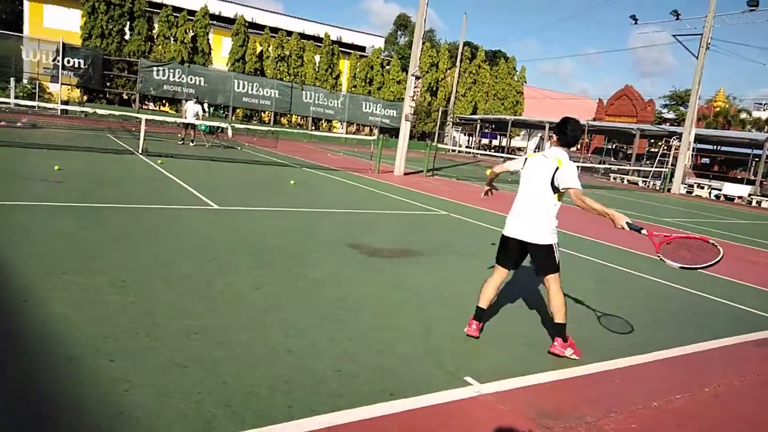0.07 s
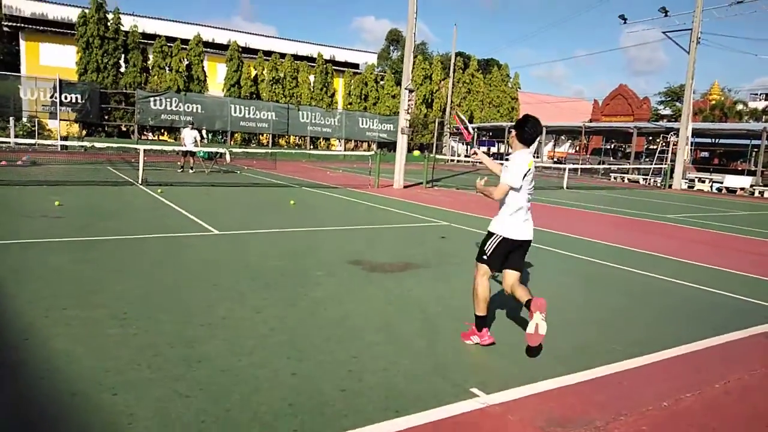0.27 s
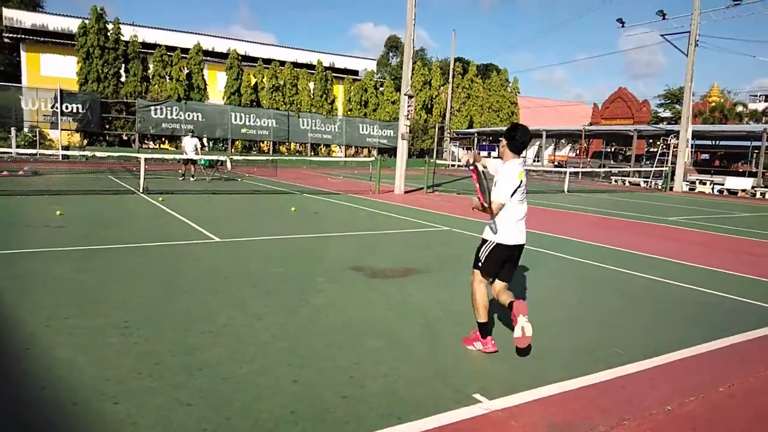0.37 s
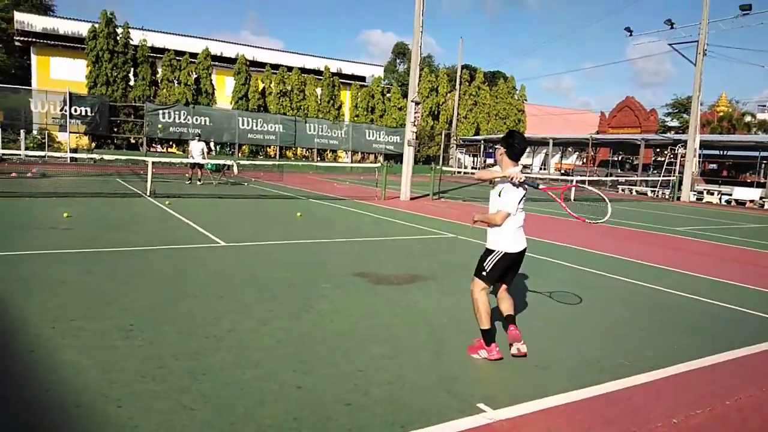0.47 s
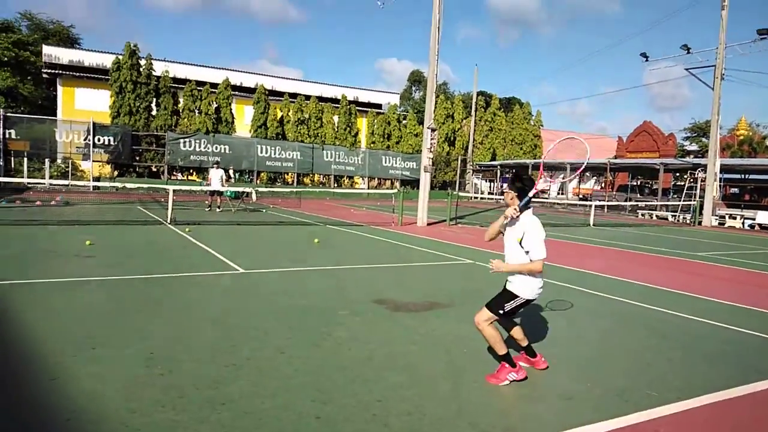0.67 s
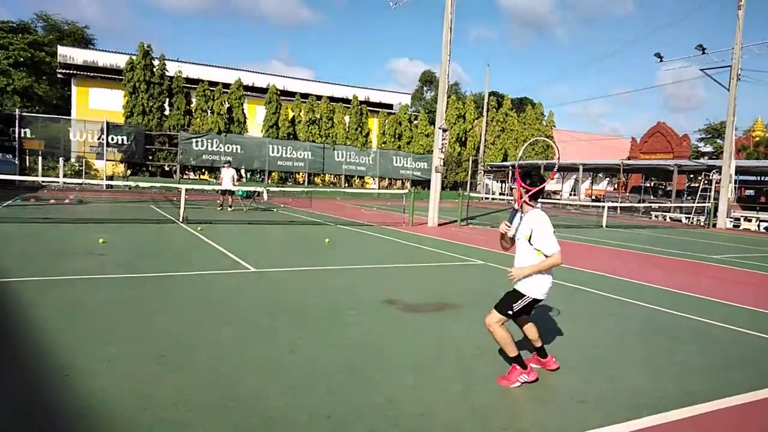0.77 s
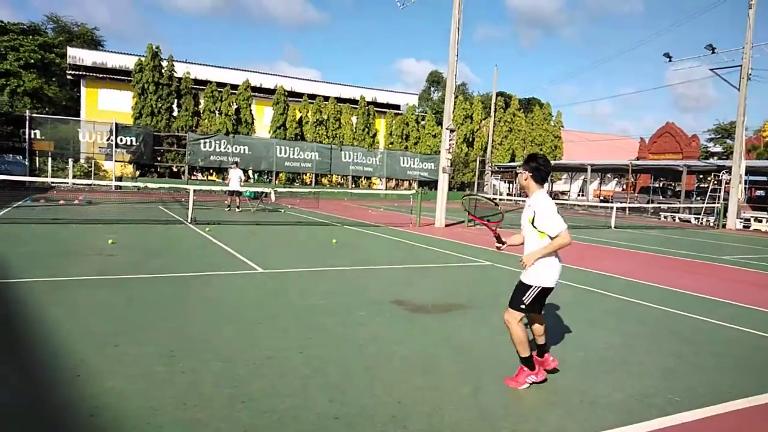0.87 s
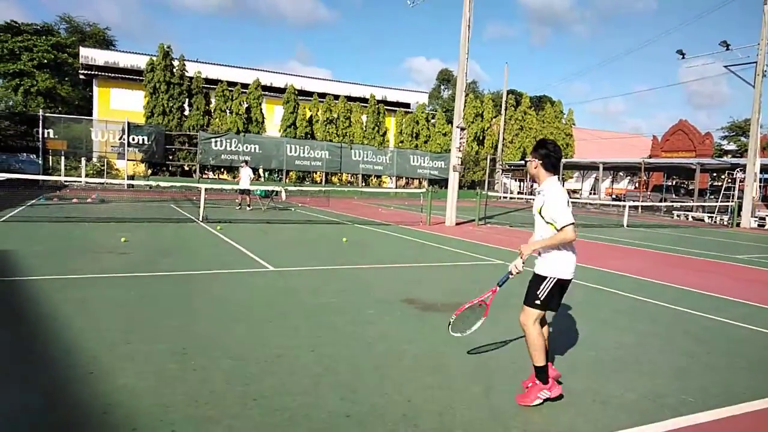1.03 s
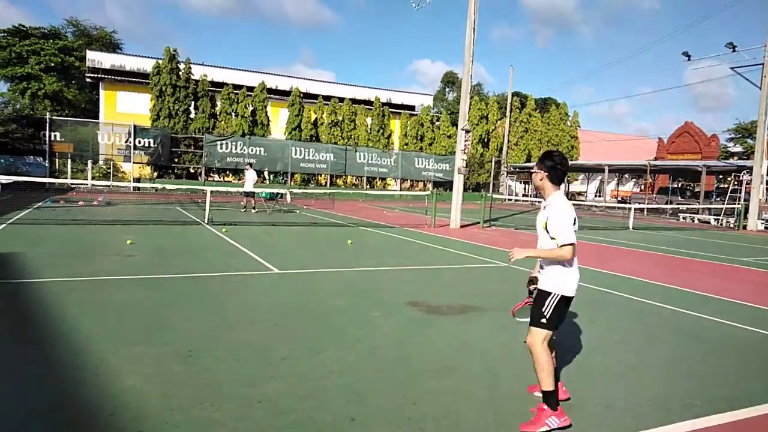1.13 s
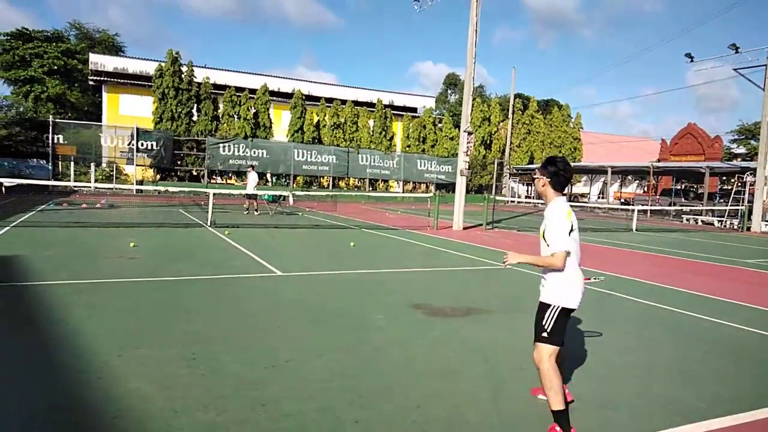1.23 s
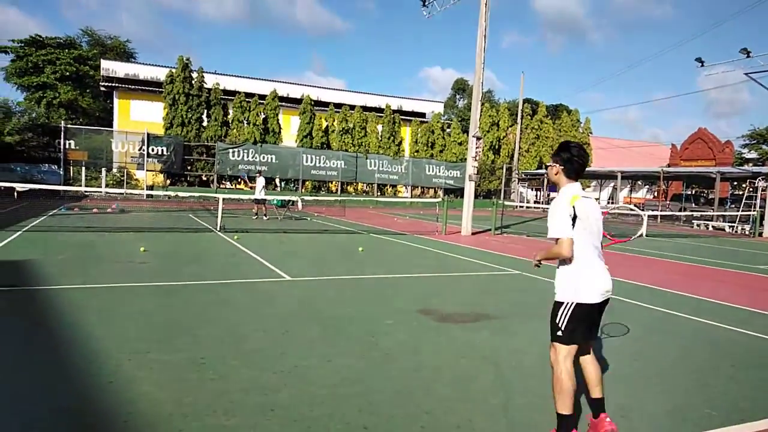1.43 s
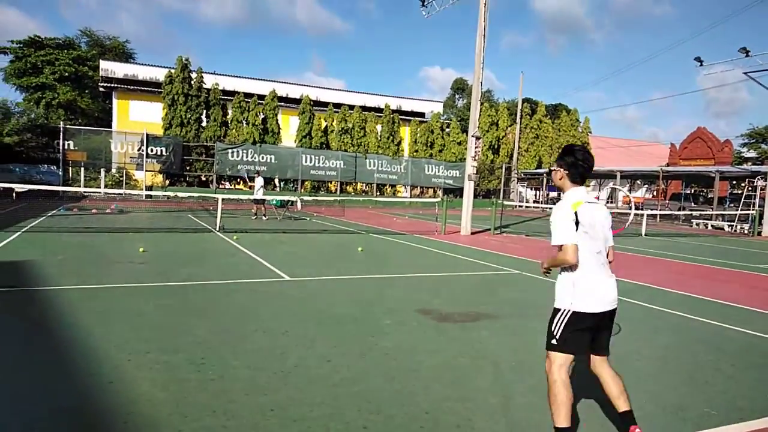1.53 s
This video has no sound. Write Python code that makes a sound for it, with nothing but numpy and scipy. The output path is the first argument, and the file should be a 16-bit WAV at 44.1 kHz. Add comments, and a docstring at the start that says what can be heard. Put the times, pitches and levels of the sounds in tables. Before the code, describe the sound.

One tennis ball hit echoes over an outdoor court, between brief squeaks of rubber soles.

```python
"""A tennis forehand on an outdoor hard court, over faint air and light wind.
A rubber sole scuffs and squeaks at the push-off, the racket swishes in, and the ball pops off the strings.
Fences and buildings send back separate echoes and a thin tail. The other shoe lands with a squeak
and a short slide, a puff of wind passes, and small taps, soft steps and gritty scuffs follow."""
import sys
import numpy as np
from scipy import signal
from scipy.fft import rfft, irfft, next_fast_len
from scipy.io import wavfile
from scipy.ndimage import map_coordinates

SR = 44100
rng = np.random.default_rng(int(sys.argv[2]) if len(sys.argv) > 2 else 0)


def master_out(mix):
    """Clip the mix to full scale and print it as 16-bit PCM to the path in sys.argv[1]."""
    frames = np.transpose(np.atleast_2d(mix))
    ceiling = np.clip(frames, -1, 1)
    pcm = np.round(ceiling * 32767).astype(np.int16)
    wavfile.write(sys.argv[1], SR, pcm)


N = 70560


def amp(db):
    """Decibels to gain."""
    return 10 ** (np.asarray(db) / 20)


def unit(x):
    """x at rms 1."""
    return x / np.sqrt(np.mean(x ** 2) + 1e-20)


def along(points, hz):
    """Read a curve of (Hz, value) points on a log frequency axis."""
    f, v = np.transpose(points)
    return np.interp(np.log(hz + 1), np.log(f + 1), v)


def since(s):
    """Seconds since s, zero before."""
    return np.maximum(np.arange(N) / SR - s, 0)


def envelope(start, attack, t60, hold=0):
    """Rise, hold and exponential release, all in seconds; t60 is the time to fall 60 dB."""
    t = since(start)
    return (1 - np.exp(-t / attack)) * 10 ** (-3 * np.maximum(t - hold, 0) / t60)


def wobble(rate):
    """A smooth random curve, rate knots a second."""
    return map_coordinates(rng.standard_normal(4096), [np.arange(N) * rate / SR], mode="wrap")


def filtered(x, response):
    """x through a filter given as gain against frequency."""
    size = next_fast_len(2 * N)
    return irfft(rfft(x, size) * response(np.fft.rfftfreq(size, 1 / SR)), size)[:N]


def eq(x, curve):
    """x through an EQ curve of (Hz, dB) points."""
    return filtered(x, lambda hz: amp(along(curve, hz)))


def low_cut(x, corner_hz):
    """Roll off the bass at 6 dB an octave."""
    return filtered(x, lambda hz: 1j * hz / (corner_hz + 1j * hz))


def noise(colour):
    """Noise of rms 1, coloured by (Hz, dB) points."""
    return unit(eq(rng.standard_normal(N), colour))


def air():
    """A steady outdoor bed, and light wind rumbling on the microphone with one stronger puff."""
    # Colours of the bed and the wind. Each row: frequency in Hz, relative level in dB.
    bed_colour = [(20, -3), (100, -9.5), (200, -12.5), (400, -22), (700, -19.5), (1100, -20.5), (1700, -28),
                  (2500, -31), (5200, -37), (6800, -32), (9000, -39.5), (13000, -37), (16000, -32.5)]
    wind_colour = [(20, -3), (40, 0), (75, -4.5), (130, -12), (300, -47), (1000, -86.5)]
    puff_s, puff_width_s, puff_db, sway_db = 0.789, 0.041, 8, 3.2
    puff = np.exp(-((since(0) - puff_s) / puff_width_s) ** 2)
    gusts = amp(sway_db * wobble(22) + puff_db * puff)
    return amp(-61.5) * noise(bed_colour) + amp(-62.5) * gusts * noise(wind_colour)


def tail(x):
    """Diffuse reverb from the trees and buildings around the court."""
    # Tone of the reverb. Each row: frequency in Hz, gain in dB.
    colour = [(100, -15), (200, 5.5), (300, 3.5), (500, -0.5), (1100, 0), (2200, 6), (4000, -6),
              (7000, 1.5), (14000, -7)]
    # Decay across the spectrum. Each row: frequency in Hz, t60 in seconds.
    decay_times = [(150, 1.1), (600, 1.36), (1100, 1.345), (2200, 0.97), (3500, 1), (7000, 0.91),
                   (14000, 0.81)]
    hz, t, bands = signal.stft(rng.standard_normal(N), SR, nperseg=256)
    fade = amp(-60 * t / along(decay_times, hz)[:, None])
    wash = signal.istft(bands * fade, SR, nperseg=256)[1][:N]
    wash *= 1 - np.exp(-since(0) / .028)  # builds up after the first echoes
    response = eq(wash / np.linalg.norm(wash), colour)
    return amp(-15.5) * signal.fftconvolve(x, response)[:N]


def wall_echoes(racket, push, landing):
    """Fences and rough walls return separate, smeared echoes with little bass."""
    # The reflections. Each row: delay in seconds, treble edge in Hz,
    # then sends in dB for the racket, the push-off and the landing.
    reflections = [(0.0259, 9000, -19.5, -34, -14.5), (.0415, 3000, -19, -29, -34),
                   (0.07, 1500, -31, -40, -40), (.0915, 9000, -24, -36, -18.5),
                   (0.1349, 4000, -20, -33, -20.5), (.1405, 1300, -29, -23, -30),
                   (.168, 1800, -25, -34, -26), (.2, 1300, -34, -42, -38), (.238, 1800, -26, -33, -41),
                   (.41, 2000, -35.5, -44, -30.5)]
    out = np.zeros(N)
    for column, source in enumerate((racket, push, landing)):
        response = np.zeros(N)
        for delay, edge_hz, *sends_db in reflections:
            wall = rng.standard_normal(N) * envelope(delay, 0.00059, t60=.03)
            wall *= amp(-1.5) / np.linalg.norm(wall)  # scatter sits just under the clean bounce
            wall[round(delay * SR)] += 1
            treble_cut = signal.butter(1, min(edge_hz, SR / 3), fs=SR)
            response += amp(sends_db[column]) * signal.lfilter(*treble_cut, wall)
        out += signal.fftconvolve(source, low_cut(response, 250))[:N]
    return out


def taps():
    """Light knocks: a click and one damped resonance."""
    # Each row: start in seconds, level in dB, resonance in Hz, t60 in seconds, treble edge in Hz.
    knocks = [(1.2169, -47.5, 921, 0.023, 2170), (1.505, -46, 1820, 0.009, 9100)]
    out = np.zeros(N)
    for start, db, hz, t60, edge_hz in knocks:
        colour = [(hz / 2, -10), (hz, 0), (edge_hz, -10), (edge_hz * 2, -32)]
        click = noise(colour) * envelope(start, 0.00024, t60)
        ring = np.sin(2 * np.pi * hz * since(start)) * envelope(start, 0.00069, t60)
        out += amp(db) * (amp(-2.5) * click + amp(1.5) * ring)
    return out


def scuffs():
    """Soles drag over grit: a hiss with separate grains cracking in it."""
    # The drags. Each row: start in seconds, level in dB, attack and t60 in seconds.
    drags = [(0.19, -48, 0.012, 0.42), (0.232, -45, 0.0019, 0.087), (.32, -48.5, 0.024, 0.22),
             (.386, -58, 0.0022, 0.029), (0.45, -52.5, 0.0018, 0.0526), (0.702, -49.5, .01, 0.14),
             (1.312, -51, 0.0041, 0.08), (1.53, -49.5, 0.00039, 0.027), (1.538, -52, .001, 0.055),
             (1.557, -60.5, .0005, 0.04)]
    # Colour of the grit. Each row: frequency in Hz, relative level in dB.
    colour = [(300, -12.5), (1500, -5), (2500, -3.5), (4000, -5), (6500, 4), (9000, -5.5), (12500, -12),
              (15500, -1.5)]
    grains_per_s, grain_energy_share = 800, .35
    out = np.zeros(N)
    for start, db, attack, t60 in drags:
        grains = unit((rng.random(N) < grains_per_s / SR) * rng.standard_normal(N))
        hiss = rng.standard_normal(N)
        grit = np.sqrt(grain_energy_share) * grains + np.sqrt(1 - grain_energy_share) * hiss
        out += amp(db) * unit(eq(grit, colour)) * envelope(start, attack, t60)
    return out


def footsteps():
    """Each soft footfall is a slap and a low heel thud."""
    # Each row: start in seconds, slap and thud levels in dB, attack and t60 in seconds.
    footfalls = [(0.244, -51, -52, 0.006, 0.11), (0.688, -48.5, -67, 0.0063, 0.18),
                 (1.281, -50.5, -61, 0.00045, 0.19), (1.531, -53.5, -59, 0.007, 0.21),
                 (1.579, -56.5, -60.5, 0.0024, 0.18)]
    # Colours of the slap and the thud. Each row: frequency in Hz, relative level in dB.
    slap_colour = [(100, -43), (450, -10), (850, 2), (1200, -6.5), (1550, -5), (2000, -27), (5000, -33),
                   (11000, -31.5), (15500, -19.5)]
    thud_colour = [(40, -12), (160, -5), (400, 0.5), (900, -31.5), (3000, -46.5)]
    out = np.zeros(N)
    for start, slap_db, thud_db, attack, t60 in footfalls:
        impact = amp(slap_db) * noise(slap_colour) + amp(thud_db) * noise(thud_colour)
        out += impact * envelope(start, attack, t60)
    return out


def swish():
    """The strings sweep through the air, swelling and fading into the stroke."""
    # Colour of the rush. Each row: frequency in Hz, relative level in dB.
    colour = [(150, -11), (400, -3.5), (900, -4.5), (2000, -0.5), (3200, -5.5), (6000, -15.5),
              (10000, -17.5), (15000, -9.5)]
    peak_s, width_s = 0.344, 0.083
    return amp(-56) * noise(colour) * np.exp(-((since(0) - peak_s) / width_s) ** 2)


def squeak(curve, overtones_db):
    """Rubber sticks and slips: an unsteady, raspy tone whose overtones grow as it gets louder."""
    pitch_jitter, flutter_db, slips_per_s = .022, 2.5, 700
    rasp_db, rasp_changes_per_s = -17, 1000
    times, hz, db = np.transpose(curve)
    t = since(0)
    level_db = np.interp(t, times, db) + flutter_db * wobble(slips_per_s)
    grip = np.sqrt(amp(level_db - db.max()))
    pitch = np.interp(t, times, hz) * (1 + pitch_jitter * wobble(slips_per_s))
    phase = 2 * np.pi * np.cumsum(pitch) / SR
    tone = np.sin(phase)
    for k, overtone_db in enumerate(overtones_db, 2):
        tone += amp(overtone_db) * grip ** (k - 1) * np.sin(k * phase)
    # A noisy skirt around the tone.
    rasp = wobble(rasp_changes_per_s) * np.sin(phase) + wobble(rasp_changes_per_s) * np.cos(phase)
    gate = (t > times[0]) * (t < times[-1])
    return np.sqrt(2) * (tone + amp(rasp_db) * rasp) * amp(level_db) * gate


def shoe_squeaks():
    """The soles slip three times: at the push-off, on landing and in a last short slide."""
    # Contours of the slips. Each row: time in seconds, pitch in Hz, level in dB.
    push = [(.187, 3380, -66), (.192, 3350, -38), (.198, 3280, -49), (.203, 3650, -36), (.21, 4130, -23),
            (.218, 4320, -32), (.2245, 4580, -33), (.228, 4280, -51), (.247, 4320, -53), (.253, 4310, -44),
            (.262, 4340, -40), (.268, 4320, -58)]
    landing = [(.711, 3150, -62), (.715, 3220, -38), (.718, 3350, -32), (.723, 3520, -36),
               (.728, 3560, -57)]
    slide = [(0.727, 4296, -51), (0.727, 4264, -43), (0.735, 4280, -48.5), (0.742, 4180, -60)]
    # Bite of each slip, in that order. Each row: 2nd and 3rd harmonic in dB re the tone at its peak.
    overtones = [(-26.5, -33), (-12.5, -26.5), (-24, -36)]
    return [squeak(curve, bite) for curve, bite in zip((push, landing, slide), overtones)]


def stroke():
    """Felt brushes the strings, the bed gives, ball and racket ring. Returns hit and court reflection."""
    # Modes of racket and ball. Each row: frequency in Hz, relative level in dB, t60 in seconds.
    modes = [(213.5, -13.5, 0.016), (554, -0.5, 0.0054), (729, -3, 0.014), (976.4, -14, 0.027),
             (1080, -6, 0.011), (1242, -12, 0.011), (1716, -17.5, 0.012), (2250, -23.5, 0.014),
             (2490, -43, .02), (2810, -21, 0.0094), (3510, -32.5, 0.014), (4280, -38.5, 0.013),
             (5360, -32, 0.017), (6360, -30, .015), (6740, -30.5, 0.012)]
    # Colour of felt on strings. Each row: frequency in Hz, relative level in dB.
    felt_colour = [(200, 5.5), (1200, -4), (2500, 0), (4000, -5), (5200, -13), (6800, -5.5), (9000, -17),
                   (12000, -22.5), (15500, -13)]
    touch_s, contact_s, launch_s = .36, 0.0016, .3616
    swell_s = 0.0022  # the modes build up while the ball is on the strings
    ground_delay_s, low_cut_hz = .0018, 45

    def pop(delay):
        """The ball dents the string bed, which throws it back and rings."""
        start = launch_s + delay
        ring = sum(amp(db) * np.sin(2 * np.pi * hz * since(start)) * envelope(start, swell_s, t60)
                   for hz, db, t60 in modes)
        dent = np.sin(np.pi * np.minimum(since(touch_s + delay) / contact_s, 1))
        return amp(1.5) * ring - amp(-21.5) * dent

    brush = amp(-29) * noise(felt_colour) * envelope(touch_s, .0004, t60=.013, hold=0.0035)
    tick = amp(-31.5) * rng.standard_normal(N) * envelope(touch_s, .0001, t60=.002, hold=0.00085)
    hit = pop(0) + brush + tick
    ground = amp(-2) * pop(ground_delay_s)
    return low_cut(hit, low_cut_hz), low_cut(ground, low_cut_hz)


def scene():
    """The racket and each shoe reach the walls from their own places; all share one tail."""
    # Tone of the pop sent out to the walls. Each row: frequency in Hz, gain in dB.
    send_eq = [(100, -4), (170, 0), (220, -3), (300, 0), (500, -2), (720, -8), (900, -0.5), (1130, 4),
               (1400, -3.5), (1800, 1), (2400, 2.5), (6000, -0.5), (14000, 1.5)]
    hit, ground = stroke()
    push, landing, slide = shoe_squeaks()
    foley = footsteps() + scuffs() + taps() + swish()
    hit_send = eq(hit, send_eq)
    landing_send = landing + amp(-1.5) * slide
    walls = wall_echoes(hit_send, push, landing_send)
    reverb = tail(hit_send + foley + amp(-5) * push + amp(2) * landing_send)
    return (hit + ground + push + landing + slide + foley + walls + reverb + air())[None]


def record(dry):
    """A brick-wall low-pass takes off the very top of the mix."""
    top_hz = 16050
    return filtered(dry[0], lambda hz: hz < top_hz)[None]


dry = scene()
out = record(dry)
master_out(out)
```